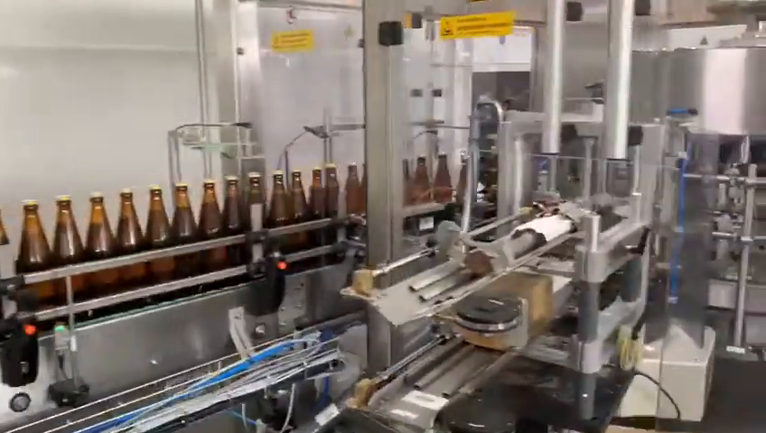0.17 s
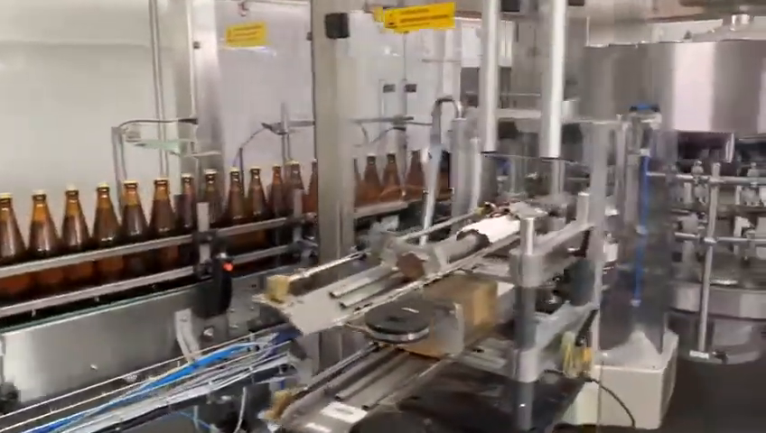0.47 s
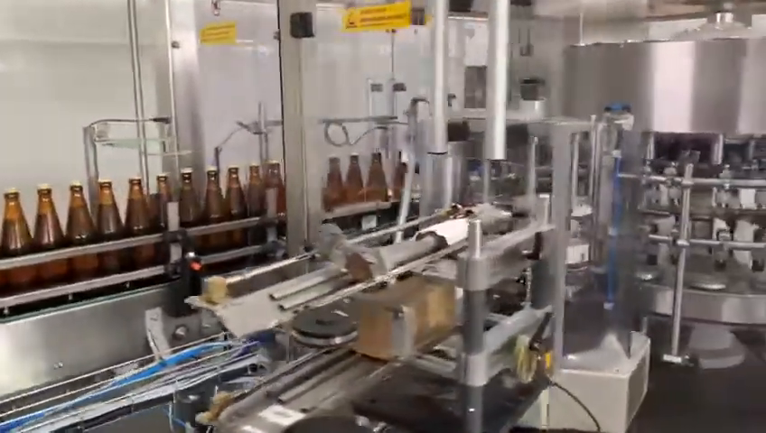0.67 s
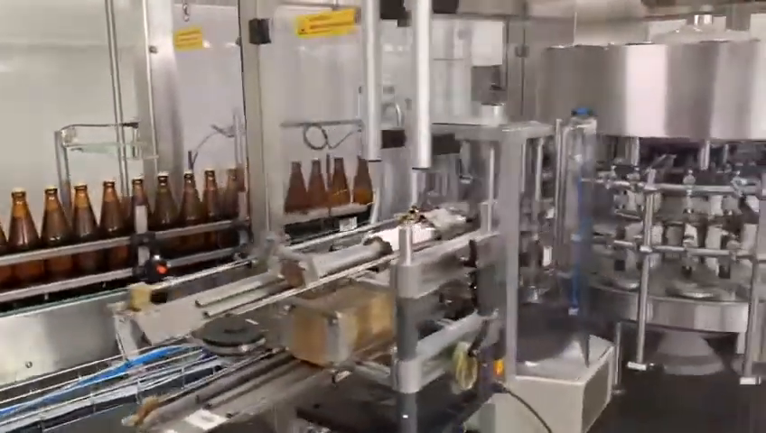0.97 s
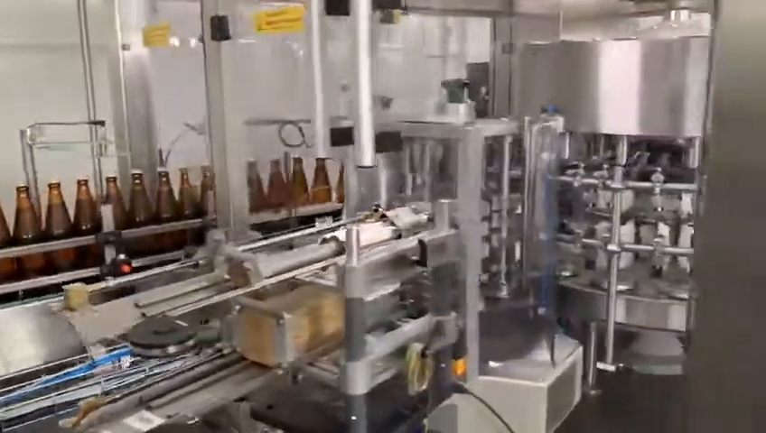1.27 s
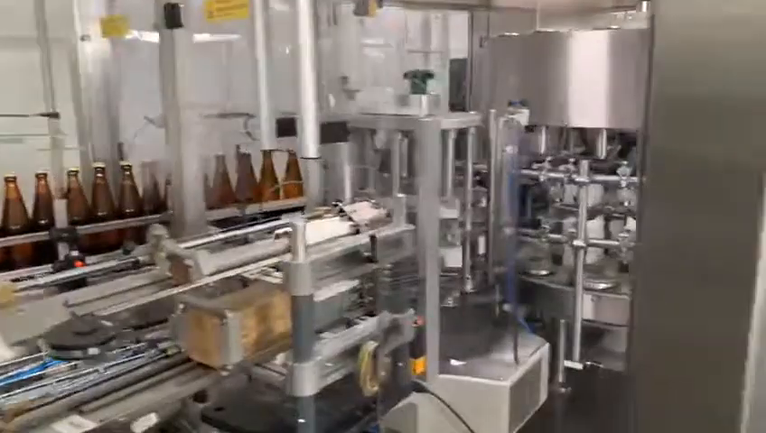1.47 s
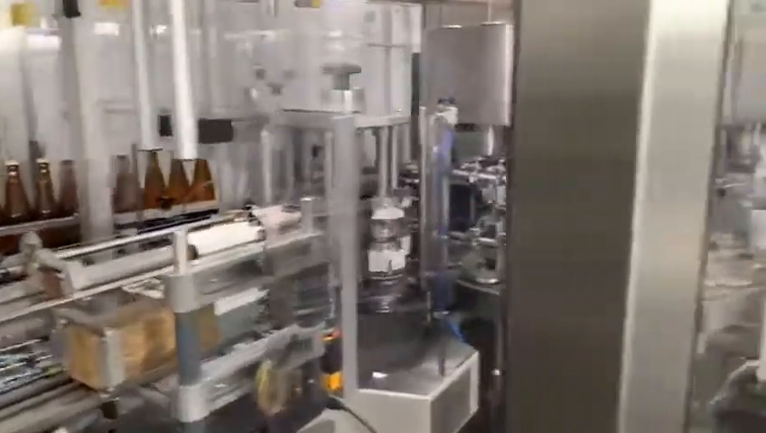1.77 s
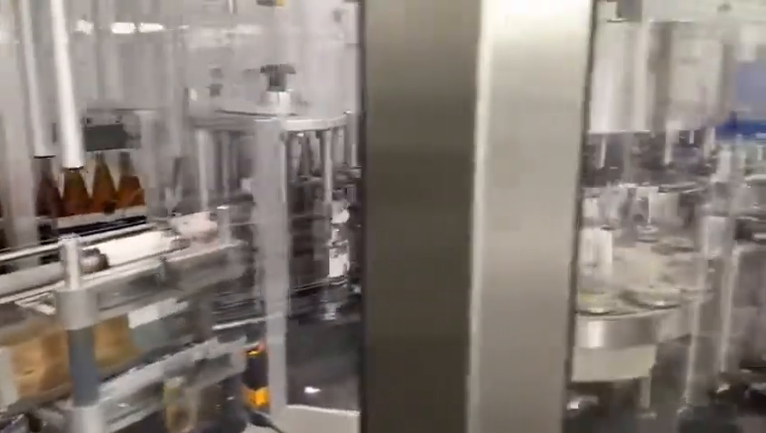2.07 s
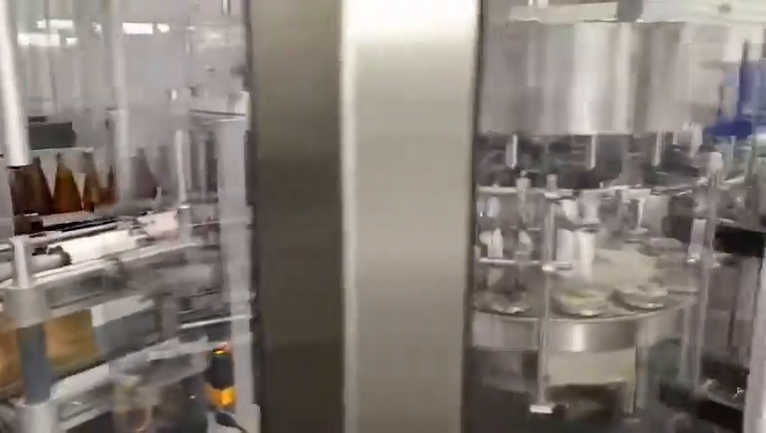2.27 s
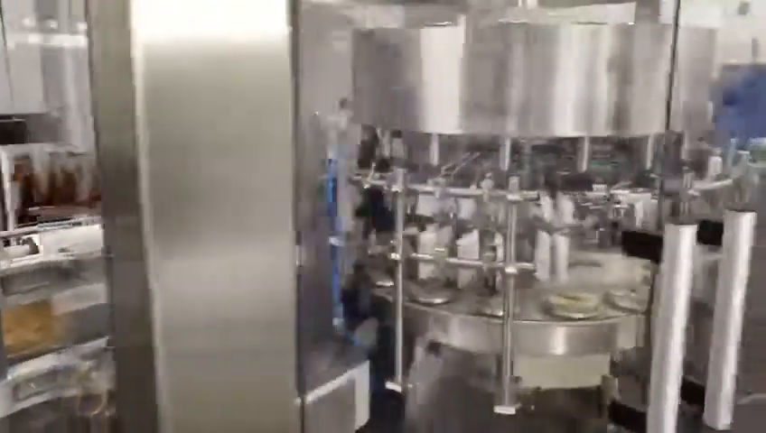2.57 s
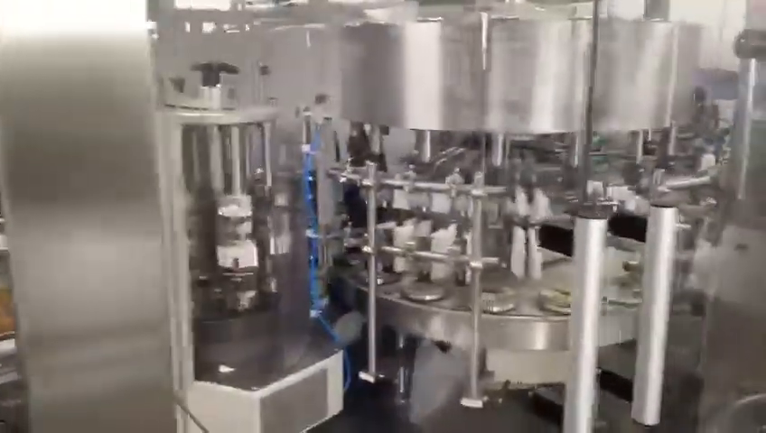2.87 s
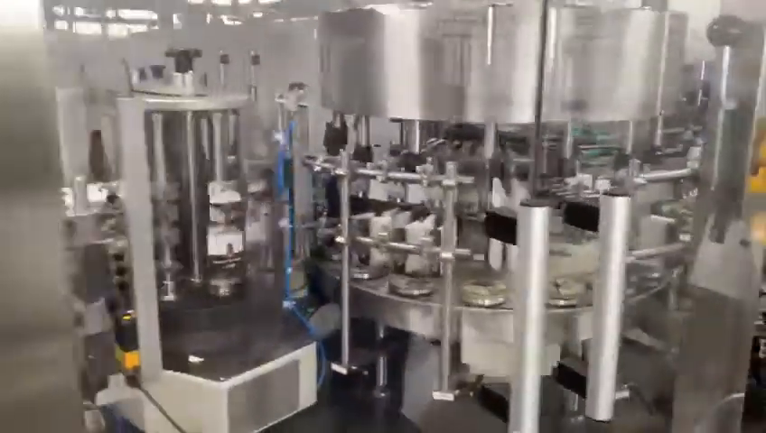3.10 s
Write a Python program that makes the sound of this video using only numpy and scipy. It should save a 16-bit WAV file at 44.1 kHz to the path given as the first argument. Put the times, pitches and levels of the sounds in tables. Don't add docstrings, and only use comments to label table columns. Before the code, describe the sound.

Bottling line clinks and rattles with hard glass knocks amid motor roar and air hiss

```python
import sys
import numpy as np
from scipy import signal
from scipy.fft import rfft, irfft, next_fast_len
from scipy.io import wavfile
from scipy.ndimage import uniform_filter1d

SR = 44100
rng = np.random.default_rng(int(sys.argv[2]) if len(sys.argv) > 2 else 0)


def bounce(signal):
    frames = np.transpose(np.atleast_2d(signal))
    limited = np.clip(frames, -1, 1)
    pcm = np.round(limited * 32767).astype(np.int16)
    wavfile.write(sys.argv[1], SR, pcm)


def gain_from_decibels(decibels):
    exponent = np.asarray(decibels, float) / 20
    return 10 ** exponent


N = 142884
LEFT_LEAD_S = 19 / 44100


def evened(x):
    return x / np.sqrt(np.mean(x ** 2) + 1e-20)


def read(points, hz):
    f, value = np.transpose(points)
    return np.interp(np.log(hz + 1), np.log(f + 1), value)


def curve(points):
    s, db = np.transpose(points)
    return gain_from_decibels(np.interp(np.arange(N) / SR, s, db))


def add(mix, s, sound):
    part = mix[round(s * SR):][:len(sound)]
    part += sound[:len(part)]


# (frequency [Hz], likeness [0-1, clipped])
LIKENESS = [(30, 3), (170, 0.84), (330, 0.34), (600, 0.74), (1000, -0.15), (2200, 0.27), (4000, 0.14),
            (6000, -0.16)]


def wash(spectrum, level_db, patch_db, swell_db):
    frames = N // 256 + 5
    hz = np.fft.rfftfreq(1024, 1 / SR)
    a, b, c, d, patches = rng.standard_normal((frames, 513, 5)).T
    patches = uniform_filter1d(patches, size=8, axis=0)
    patches = evened(uniform_filter1d(patches, size=12, axis=1))
    swell = evened(uniform_filter1d(rng.standard_normal(frames), size=30))
    same = np.clip(read(LIKENESS, hz), 0, 1)[:, None]
    late = np.exp(-2j * np.pi * hz * LEFT_LEAD_S)[:, None]
    left = a + 1j * b
    right = same * late * left + np.sqrt(1 - same ** 2) * (c + 1j * d)
    gain_db = read(spectrum, hz)[:, None] + patch_db * patches + swell_db * swell
    noise = signal.istft(np.array([left, right]) * gain_from_decibels(gain_db), nperseg=1024, noverlap=768)[1]
    return gain_from_decibels(level_db) * evened(noise[:, :N])


# (frequency [Hz], level [dB per Hz])
ROAR_SPECTRUM = [(15, -50), (25, -83), (91, -4.5), (252, -3.5), (486, -4), (1010, -4.5), (1400, -7),
                 (1570, -7), (2500, -7.5), (3250, -13.5), (5500, -120)]


def roar():
    return wash(ROAR_SPECTRUM + [(4000, -85.0)], level_db=-26, patch_db=1.2, swell_db=0.15)


# (frequency [Hz], level [dB per Hz])
HISS_SPECTRUM = [(1500, -39), (2500, -5), (4500, -4), (7000, -7), (9500, -14.5), (12000, -13)]


def hiss():
    return wash([(800, -53.0)] + HISS_SPECTRUM, level_db=-31.5, patch_db=2.2, swell_db=0.3)


def tone(hz, width_hz, waver):
    r = np.exp(-np.pi * width_hz / SR)
    slow = signal.lfilter([1 - r], [1, -r], rng.standard_normal((N, 2)) @ [1, 1j])
    carrier = np.exp(2j * np.pi * hz * np.arange(N) / SR)
    return evened(((1 + waver * slow / np.std(slow)) * carrier).real)


def hum():
    hz, width_hz = 245, 14
    both = tone(hz, width_hz, 3.0)
    return gain_from_decibels(-43.5) * np.array([both + 0.32 * tone(hz, width_hz, 15.0) for port in "LR"])


# (time [s], level [dB])
WHINE_LEVEL = [(0, -37), (.1, -40), (.17, -50), (.23, -36), (.45, -36), (.58, -46), (.85, -56), (1.2, -47),
               (1.4, -56), (1.9, -54), (2.02, -44), (2.16, -54), (2.3, -39), (2.43, -43), (2.55, -54),
               (3.24, -54)]


def whine():
    hz, width_hz, trim_db = 2413, 5.6, -1
    both = tone(hz, width_hz, 0.14)
    ports = np.array([both + 0.79 * tone(hz, width_hz, 4.7) for port in "LR"])
    return gain_from_decibels(trim_db) * curve(WHINE_LEVEL) * ports


def hall(x):
    t60_s, top_t60_s, tail_db, direct_db = 0.27, 0.28, 2, -6
    taps = np.zeros((2, SR // 2))
    at = np.arange(200, SR // 2 - 20, 20) + rng.integers(0, 20, (2, (SR // 2 - 201) // 20))
    np.put_along_axis(taps, at, rng.choice([-1., 1.], at.shape), 1)
    hz, t, z = signal.stft(taps, SR, nperseg=256)
    t60 = read([(1500, t60_s), (9000, top_t60_s)], hz)[:, None]
    tail = signal.istft(z * gain_from_decibels(-60 * t / t60), SR, nperseg=256)[1]
    tail *= gain_from_decibels(tail_db) / np.linalg.norm(tail[0])
    tail[0, 0] = tail[1, round(LEFT_LEAD_S * SR)] = gain_from_decibels(direct_db)
    return signal.fftconvolve(x[None], tail, axes=1)[:, :N]


# (frequency [Hz], spread between bottles [Hz], level [dB], T60 [s])
GLASS_MODES = [(1528, 14, -8, 0.06), (1566, 5, -4, 0.11), (2665, 45, 2, 0.04), (3030, 45, -5, 0.045),
               (3340, 53, -2, 0.048), (3500, 45, -12, 0.05), (4383, 130, -4.5, 0.045), (4900, 110, 0, 0.04),
               (5355, 51, -4.5, 0.06), (5800, 70, -2, 0.03), (6796, 49, -22.5, 0.034),
               (6740, 27, -14, 0.085), (7900, 65, -13, 0.021), (8640, 96, -17, 0.055)]


def bottle(chance, low_db, high_db, rise_s):
    hz, spread, db, t60 = np.transpose(GLASS_MODES)[:, :, None]
    t = np.arange(SR // 4) / SR
    mode_spread_db = 3.5
    db = db + np.where(hz < 2000, low_db, high_db) + mode_spread_db * chance[:, 1:2]
    own_hz = hz + spread * chance[:, :1]
    rings = gain_from_decibels(db - 60 * t / t60) * np.sin(2 * np.pi * (own_hz * t + chance[:, 2:]))
    return rings.sum(0) * np.minimum(t / rise_s, 1)


# level [dB], in mode order
FAR_CARRY = [-7, -4.5, 6.5, -7.5, -8.5, -9, 0.5, 8.5, -5, -24, 17, -5, -9, -7]
# (time [s], level [dB])
JOSTLE_LEVEL = [(0.0, -45.5), (0.46, -37), (0.47, -38.5), (0.89, -41), (0.94, -50), (0.98, -38.5),
                (1.67, -33), (1.84, -31), (1.93, -35.5), (3.03, -46.5), (3.07, -46), (3.24, -36)]


def rattle():
    bottles, taps_per_s, tap_spread_db = 44, 500, 5
    near_trim_db, far_db, rise_s = 4, -34, 0.00044
    force = gain_from_decibels(tap_spread_db * np.minimum(rng.exponential(1, N), 4))
    force = force * (rng.random(N) < taps_per_s / SR)
    which = rng.integers(0, bottles, N)
    chance = rng.standard_normal((bottles, len(GLASS_MODES), 3))
    carry_db = np.array(FAR_CARRY)[:, None]
    taps = []
    for k in range(bottles):
        tilt_db = k % 2 * carry_db
        ring = bottle(chance[k], tilt_db, tilt_db, rise_s)
        taps.append(signal.oaconvolve(force * (which == k), ring)[:N])
    near = evened(sum(taps[::2])) * curve(JOSTLE_LEVEL) * gain_from_decibels(near_trim_db)
    return near + evened(sum(taps[1::2])) * gain_from_decibels(far_db)


# (time [s], tick [dB], low ring [dB], high ring [dB])
HARD_KNOCKS = [(0.012, -20, -12, -23.5), (0.2622, -19.5, -17, -32), (0.4644, -16, -17, -20),
               (0.523, -49, -28, -38.5), (0.692, -19.5, -15, -23.5), (0.7018, -32, -20, -41),
               (0.9591, -49, -34, -25), (0.978, -28, -17, -45), (1.1055, -25, -35, -19),
               (1.1627, -49, -19, -35), (1.261, -22.5, -35, -25), (1.3247, -15.5, -49, -33),
               (1.3842, -15.5, -33, -21), (1.4671, -11.5, -13, -20), (1.566, -14, -41, -26),
               (1.726, -12, -50, -19), (1.7464, -78, -20, -67), (1.7849, -7, -19, -15.5),
               (1.8104, -34, -24, -19), (1.8946, -29, -48, -37), (1.9679, -25, -49, -23),
               (2.0671, -23, -51, -21), (2.144, -37, -38, -31), (2.2162, -16, -29, -19),
               (2.4487, -20, -33, -60), (2.6108, -35.5, -22, -30), (2.86, -61, -28, -93),
               (3.0334, -35, -25, -39), (3.08, -34, -45, -27)]


def knocks():
    grit_db, tick_low_hz, tick_trim_db, tick_t60_s, tick_rise_s = -9.5, 5530, 4, 0.034, 0.004
    low_trim_db, high_trim_db, ring_rise_s = -4.5, -4.5, 0.0033
    tilt_db = 0.37 * np.array(FAR_CARRY)[:, None]
    out, t = np.zeros(N), np.arange(SR // 8) / SR
    chance = rng.standard_normal((len(HARD_KNOCKS), 2, len(GLASS_MODES), 3))
    noise = rng.standard_normal((len(HARD_KNOCKS), 2, len(t)))
    grit = noise[:, 0] * gain_from_decibels(grit_db * evened(uniform_filter1d(noise[:, 1], size=90)))
    bright = signal.butter(2, tick_low_hz, "high", fs=SR, output="sos")
    grit = evened(signal.sosfilt(bright, grit))
    for (s, tick_db, low_db, high_db), pair, g in zip(HARD_KNOCKS, chance, grit):
        fade = gain_from_decibels(tick_db + tick_trim_db - 60 * t / tick_t60_s)
        add(out, s, g * fade * np.minimum(t / tick_rise_s, 1))
        for c in pair:
            add(out, s, bottle(c, low_db + low_trim_db, high_db + high_trim_db - tilt_db, ring_rise_s))
    return out


# (time [s], peak level [dB], pitch [Hz])
RIM_CLICKS = [(0.2612, -20.5, 8710), (0.4667, -22, 9250), (0.6917, -27, 8660), (0.9601, -25, 8700),
              (1.0913, -40, 9010), (1.1073, -21, 9150), (1.1594, -36, 9050), (1.26, -32, 9250),
              (1.3394, -41, 9250), (1.3842, -22, 10000), (1.468, -30, 9100), (1.5682, -23, 9300),
              (1.7239, -18, 8800), (1.7857, -43, 9370), (1.8144, -24, 9490), (1.9673, -23, 9600),
              (2.0661, -24.5, 9280), (2.2163, -36, 9200), (2.4462, -36, 9430), (3.1836, -34, 9300)]


def clicks():
    lead_s, rise_s, t60_s, width_hz, trim_db = 0.003, 0.005, 0.08, 550, -8.5
    out, t = np.zeros(N), np.arange(SR // 10) / SR
    for (s, db, hz), g in zip(RIM_CLICKS, rng.standard_normal((len(RIM_CLICKS), len(t)))):
        band = signal.butter(1, [hz - width_hz, hz + width_hz], "band", fs=SR, output="sos")
        shape = gain_from_decibels(db + trim_db - 60 * t / t60_s) * np.minimum(t / rise_s, 1)
        add(out, s - lead_s, evened(signal.sosfilt(band, g)) * shape)
    return out


def scene():
    background = roar() + hiss() + hum()
    glass = hall(rattle() + knocks())
    return background + glass + whine() + clicks()


# (frequency [Hz], depth [dB])
DROPOUT_DEPTH = [(800, 15), (1500, 9.5), (3000, 8), (3800, 4.5), (5000, 7), (6200, 3.5), (7500, 4),
                 (9000, 7.5)]


def muted(x):
    lead, wander_db = 1024 - 496, 2.6
    frame = dict(window="cosine", nperseg=2048, noverlap=1024)
    hz, _, z = signal.stft(np.pad(x, ((0, 0), (lead, 0))), SR, **frame)
    power = abs(z) ** 2
    spot = uniform_filter1d(power, size=4, axis=1)
    around = uniform_filter1d(power.mean(0), size=70, axis=0)
    wander = uniform_filter1d(rng.standard_normal(z.shape), size=24, axis=1)
    wander = evened(uniform_filter1d(wander, size=3, axis=2))
    limit_db = wander_db * wander - read(DROPOUT_DEPTH, hz)[:, None]
    kept = spot > around * gain_from_decibels(2 * limit_db)
    return signal.istft(z * kept, SR, **frame)[1][:, lead:lead + N]


# (frequency [Hz], width [Hz], gain [dB])
HOUSING_DIPS = [(2500, 64, -9), (3780, 240, -2.5), (4990, 370, -2), (5900, 910, -7.5), (5440, 190, 2)]
# (frequency [Hz], level [dB])
PORT_BALANCE = [(40, -1), (130, 0.5), (260, -3), (550, 0), (1140, -0.9), (2380, -0.9), (4980, -0.5),
                (10400, -3)]
# (frequency [Hz], gain [dB])
SUM_GAIN = [(6500, 0), (6950, -2), (7450, -9), (7950, -3), (8400, 3), (9900, 3), (10600, -5), (10950, -14)]
# (frequency [Hz], gain [dB])
DIFFERENCE_GAIN = [(6500, 0), (7000, 2), (7600, 3), (8100, 1), (8700, -13), (9200, -22), (9700, -14),
                   (10500, 2)]


def colour_and_thin(dry):
    size = next_fast_len(N + 4096)
    hz = np.fft.rfftfreq(size, 1 / SR)
    dips_db = sum(db * np.exp(-((hz - f) / w) ** 2) for f, w, db in HOUSING_DIPS)
    balance_db = np.outer([.5, -.5], read(PORT_BALANCE, hz))
    left, right = rfft(dry, size) * gain_from_decibels(dips_db + balance_db)
    mid = (left + right) / 2 * gain_from_decibels(read(SUM_GAIN, hz))
    side = (left - right) / 2 * gain_from_decibels(read(DIFFERENCE_GAIN, hz))
    mid, side = muted(irfft(np.array([mid, side]), size)[:, :N])
    return np.array([mid + side, mid - side])


def roll_off(x):
    return signal.sosfilt(signal.butter(12, 11000, fs=SR, output="sos"), x)


def record(dry):
    mix = colour_and_thin(dry)
    return roll_off(mix)


dry = scene()
out = record(dry)
bounce(out)
```